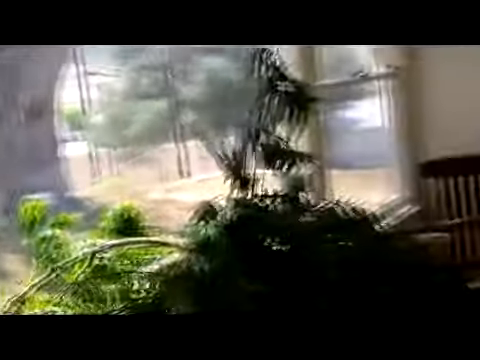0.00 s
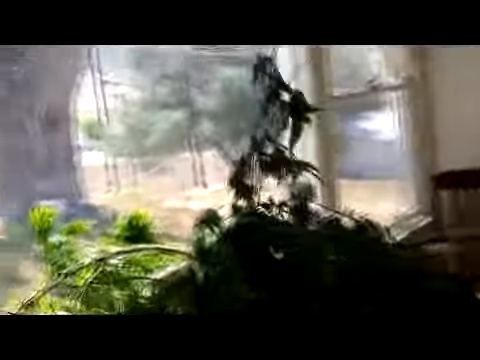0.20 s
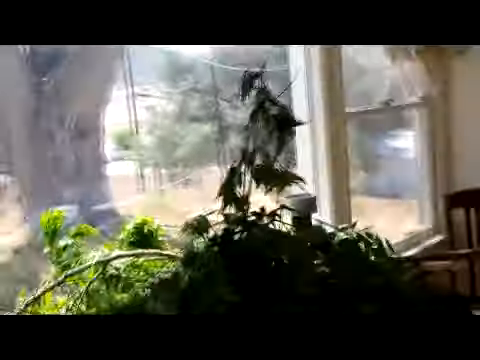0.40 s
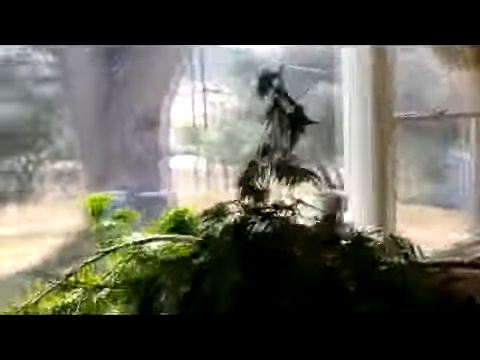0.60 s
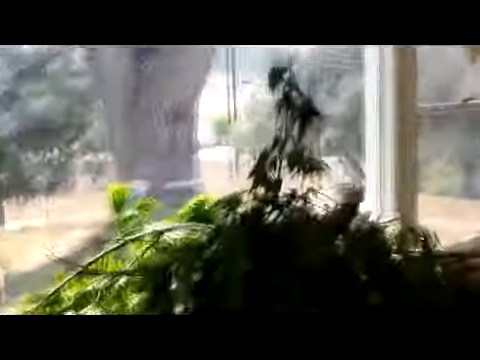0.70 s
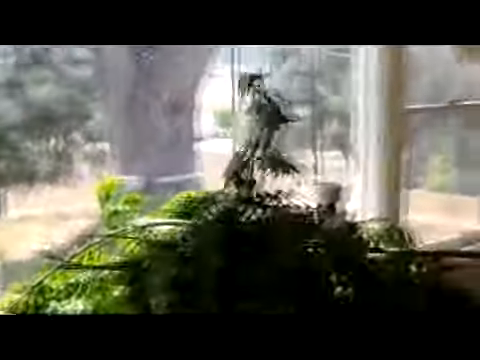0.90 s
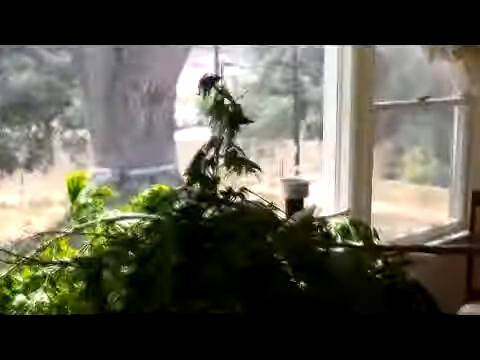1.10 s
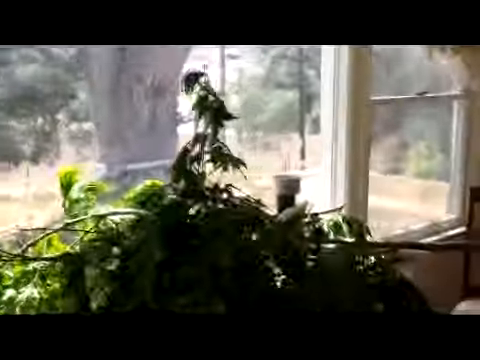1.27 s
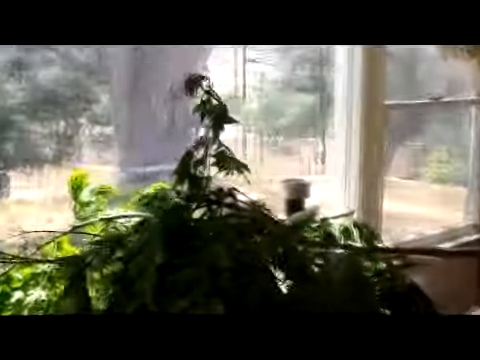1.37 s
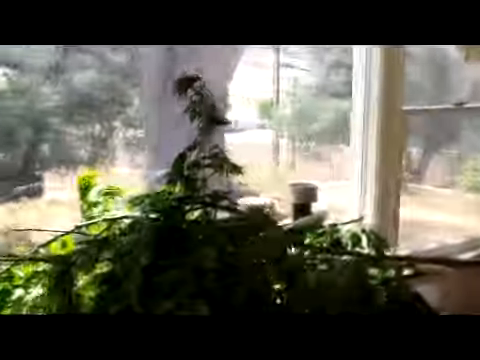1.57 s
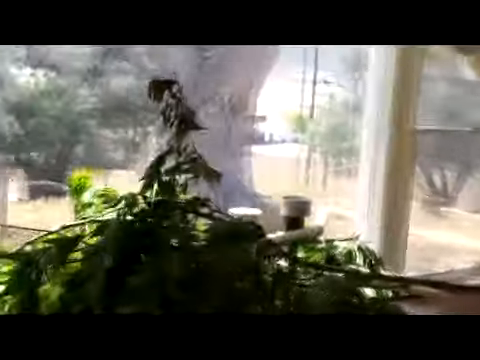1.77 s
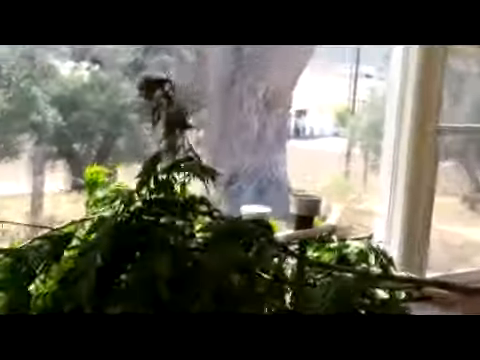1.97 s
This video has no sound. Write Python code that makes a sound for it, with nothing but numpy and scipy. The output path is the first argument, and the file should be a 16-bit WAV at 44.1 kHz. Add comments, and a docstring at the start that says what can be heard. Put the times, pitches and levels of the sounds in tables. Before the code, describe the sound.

Twigs crack amid leaf rustle, crisp from the start over low rumble. A bright double crack with a short room tail comes at 0.23 s, with faint hollow knocks. A scuff swells into dull thumps around 0.5 s, with a piercing dry snap at 0.52 and a weaker one at 0.76. Rustling thins; small cracks come at 0.8, 0.9, 1.36 and 1.5-1.7 s, with muffled rubbing as leaves swell again.

```python
"""Leaves rustle from the first moment over a low rumble, as a parrot works through branches in a living room.
Twigs crack with a short room tail; the leaves are dense clicks, the cracks clicks with splinters.
Someone shifts about with the camera: a scuff, filtered noise, swells into a dull thump of low resonances.
Softer bumps and faint hollow knocks are heard too, over quiet room air.
Two sharp, dry snaps, each a filtered double click, sound right beside the microphone."""
import sys
import numpy as np
from scipy import signal
from scipy.fft import rfft, irfft
from scipy.io import wavfile
from scipy.ndimage import uniform_filter1d

SR = 44100
rng = np.random.default_rng(int(sys.argv[2]) if len(sys.argv) > 2 else 0)


def dump(signal):
    """Clip the signal to [-1, 1] and save it as 16-bit WAV at the path in sys.argv[1]."""
    limited = np.clip(np.atleast_2d(signal).T, -1, 1)
    pcm = np.round(limited * 32767).astype(np.int16)
    wavfile.write(sys.argv[1], SR, pcm)


N = 88200
T = np.arange(N) / SR  # s


def undb(db):
    """Decibels to gain."""
    return 10 ** (np.asarray(db) / 20)


def unit(x):
    """Scale to rms 1."""
    return x / np.sqrt(np.mean(x ** 2))


def burst(x):
    """Scale each channel to energy 1."""
    return x / np.sqrt(np.sum(x ** 2, axis=-1, keepdims=True))


def curve(rows):
    """Gain over time from (t/s, level/dB) rows."""
    return undb(np.interp(T, *np.array(rows).T))


def delay(x, s):
    """Start a sound s seconds later, to a fraction of a sample, by turning its phases."""
    turn = np.exp(-1j * np.pi * np.arange(N + 1) * s * SR / N)
    return irfft(rfft(x, 2 * N) * turn)[..., :N]


def colour(x, points):
    """Causal minimum-phase filter through (f/Hz, level/dB) points."""
    hz, db = np.array(points).T
    f = np.maximum(np.arange(N + 1) * SR / (2 * N), 1)
    log_gain = np.log(undb(np.interp(np.log(f), np.log(hz), db)))
    # folding the cepstrum onto positive times makes the filter causal
    cepstrum = irfft(log_gain)
    cepstrum[1:N] *= 2
    cepstrum[N + 1:] = 0
    return irfft(rfft(x, 2 * N) * np.exp(rfft(cepstrum)))[..., :N]


def noise(points, side):
    """Coloured stereo noise of rms 1; side sets its width."""
    middle, difference = rng.standard_normal((2, N))
    stereo = np.array([middle + side * difference, middle - side * difference])
    return unit(colour(stereo, points))


def grains(per_s, scatter_db):
    """Dense tiny clicks of uneven size and random sign, different at each microphone port."""
    hit = rng.random((2, N)) < per_s / SR
    sign = np.sign(rng.standard_normal((2, N)))
    size = undb(scatter_db * np.minimum(rng.exponential(size=(2, N)), 5))
    return unit(hit * sign * size)


def fade(t60):
    """Exponential decay, 60 dB in t60 seconds."""
    return np.exp(-np.log(1000) * T / t60)


def ring(hz, t60):
    """One struck resonance: a decaying sine."""
    return np.sin(2 * np.pi * hz * T) * fade(t60)


def high_pass(x, hz):
    """Second-order cut of the bass below hz."""
    return signal.sosfilt(signal.butter(2, hz, "high", fs=SR, output="sos"), x)


def rustle():
    """Leaves brush in a fluttering crackle with stray ticks; a thin high fizz is strongest in the loud rustling."""
    # rustle level: t/s, level/dB
    brushing = [(0, -44.5), (.14, -43.5), (.22, -44.5), (.39, -44.5), (.47, -44), (.52, -46.5), (.6, -52),
                (.68, -54), (.78, -59), (.86, -56.5), (1.0, -60.5), (1.16, -62.5), (1.26, -59.5),
                (1.35, -62), (1.47, -59), (1.65, -49), (1.85, -46), (2, -45.5)]
    # colour of the leaves: f/Hz, level/dB
    leaf_colour = [(300, -9.5), (900, -11.5), (2000, -11.5), (3500, -8), (5000, -5.5), (6600, 0.5),
                   (8000, -1.5), (10000, -9), (12000, -13.5), (14000, -28.5), (15200, -51.5)]
    # colour of the thin high fizz over the leaves: f/Hz, level/dB
    fizz_colour = [(6000, -38), (10000, 0), (11500, 3), (14300, 4), (15200, -57)]
    grains_per_s, scatter_db, flicker_db = 9000, 1, 0.58
    ticks_per_s, tick_db, tick_t60_s = 59, -11.5, 0.067
    fizz_db, fizz_full_db = -14.5, -46.5  # the fizz's share when the rustle is at the second level

    flutter = rng.standard_normal(N)
    for _ in range(2):
        flutter = uniform_filter1d(flutter, size=700)
    flutter = unit(flutter)

    crackle = grains(grains_per_s, scatter_db)
    starts = (rng.random(N) < ticks_per_s / SR) * rng.random(N)
    tick_level = signal.fftconvolve(starts, fade(tick_t60_s))[:N]
    ticks = unit(tick_level * rng.standard_normal((2, N)))
    leaves = unit(colour(crackle + undb(tick_db) * ticks, leaf_colour))

    level = curve(brushing)
    fizz = unit(colour(grains(grains_per_s, scatter_db), fizz_colour))
    fizz_share = undb(fizz_db) * level / undb(fizz_full_db)  # the fizz follows the level squared
    return (leaves + fizz_share * fizz) * level * undb(flicker_db * flutter)


def background():
    """Low rumble and rubbing of movement, as noise of changing level, over the quiet air of the room."""
    # rumble level: t/s, level/dB
    rumble_level = [(0, -55), (.22, -54), (.29, -42), (.4, -52), (.47, -46.5), (.54, -39.5), (.62, -47.5),
                    (.74, -69), (.9, -65), (1.0, -71.5), (1.55, -68), (1.6, -55.5), (2, -57)]
    # rumble colour: f/Hz, level/dB
    rumble_colour = [(20, -8), (45, 6.5), (70, 2), (130, -2.5), (220, -4.5), (330, -9), (480, -23),
                     (900, -21.5), (2500, -66)]
    # level of the low, muffled rubbing: t/s, level/dB
    rub_level = [(1.56, -98), (1.59, -49), (1.66, -55.5), (1.72, -47), (1.8, -61), (1.87, -51), (2, -69)]
    # rubbing colour: f/Hz, level/dB
    rub_colour = [(40, -39), (80, -4), (115, 2.5), (175, -4), (240, -6), (330, -20.5), (600, -27.5),
                  (2000, -54)]
    # room air colour: f/Hz, level/dB
    air_colour = [(20, 23), (65, 1.5), (120, -2.5), (300, -0.5), (600, -11.5), (1500, -41), (5000, -20),
                  (14000, -50)]
    moving_side, air_side, air_db = 0.18, 0.54, -72.5

    rumble = noise(rumble_colour, moving_side) * curve(rumble_level)
    rubbing = noise(rub_colour, moving_side) * curve(rub_level)
    return rumble + rubbing + undb(air_db) * noise(air_colour, air_side)


def knocks():
    """Faint soft knocks, each with one short hollow note that rises gently and dies away."""
    # knocks: t/s, level/dB, f/Hz of the note
    knock_rows = [(0.173, -47, 341), (0.269, -34.5, 281.5), (0.351, -42, 290), (1.844, -41, 347)]
    t60_s, rise_s = 0.088, 0.0029
    out = 0
    for s, db, hz in knock_rows:
        note = ring(hz, t60_s) * (1 - np.exp(-T / rise_s))
        out = out + undb(db) * delay(note, s)
    return out


def twigs():
    """Each twig breaks in a few ms of splinters; the room rings on briefly."""
    # cracks: t/s, level/dB, woody body below 4 kHz level/dB, knock of the stem level/dB
    crack_rows = [(0.2314, 0, -3, 0), (.2432, -12, 0.5, 0), (.808, -30, 1.5, -20), (0.924, -30, 0, -36),
                  (1.3608, -22.5, -2, -17), (1.524, -38.5, 5, -9), (1.585, -22.5, -1.5, -12),
                  (1.69, -22.5, 7, -3)]
    # colour of the bright splinters: f/Hz, level/dB
    bright_colour = [(3000, -26.5), (3900, -11.5), (4400, -3.5), (5500, 0), (6800, -2), (8400, -3.5),
                     (10000, -11.5), (11500, -12), (13000, -16), (14400, -38), (15300, -62)]
    # colour of the woody body: f/Hz, level/dB
    wood_colour = [(300, -39), (900, -20), (1500, -11.5), (2000, -12), (3300, -7), (5000, -16),
                   (12000, -45), (15500, -81)]
    # colour of the stem's knock: f/Hz, level/dB
    stem_colour = [(300, -36), (520, -17), (630, -5.5), (700, -9), (790, -2.5), (950, -11), (1200, -6),
                   (1450, -26), (3000, -48), (15500, -77)]
    crack_db = 5  # added to every crack's level
    splinters_per_s, scatter_db, splinter_s, splinter_db = 6000, 9, 0.002, 7
    room_t60_s, room_build_s, room_db = 0.3, 0.0014, 7.5

    bright = wood = stem = 0
    for s, db, wood_db, stem_db in crack_rows:
        splinters = burst(grains(splinters_per_s, scatter_db) * np.exp(-T / splinter_s))
        crack = burst(signal.unit_impulse(N) + undb(splinter_db) * splinters)
        reflections = grains(per_s=12000, scatter_db=-1.5)
        room = burst(reflections * fade(room_t60_s) * (1 - np.exp(-T / room_build_s)))
        heard = undb(db + crack_db) * delay(crack + undb(room_db) * room, s)
        bright = bright + heard
        wood = wood + undb(wood_db) * heard
        stem = stem + undb(stem_db) * heard
    return colour(bright, bright_colour) + colour(wood, wood_colour) + colour(stem, stem_colour)


def scuffs():
    """Brief rubs that swell and stop: each stirs a hollow resonance, with grit on top."""
    # scuffs: t/s of the peak, level/dB, rise/s, fall/s, gritty treble level/dB, f/Hz of the hollow
    scuff_rows = [(0.467, -47.5, 0.041, 0.0092, 1.5, 865), (0.488, -35, 0.013, .016, -10.5, 650),
                  (0.551, -54.5, 0.016, 0.014, 13.5, 566), (1.16, -72.5, 0.024, 0.052, -1, 620),
                  (1.251, -66, 0.029, 0.042, 1, 566), (1.98, -57, 0.036, 0.069, 2.5, 557)]
    # colour of the rub: f/Hz, level/dB
    scuff_colour = [(150, 0.5), (370, -2), (470, -3), (650, -2), (900, -0.5), (1200, -8), (1800, -18),
                    (3500, -53)]
    # colour of the grit: f/Hz, level/dB
    grit_colour = [(700, -20), (1600, 13.5), (2500, 9), (3600, 7), (5500, 10.5), (7000, 0), (10000, -67),
                   (14000, -59)]
    side, rub_db, hollow_db, hollow_t60_s = 0.29, 2, -2, 0.06

    rub = noise(scuff_colour, side)
    grit = unit(colour(grains(per_s=6000, scatter_db=-0.5), grit_colour))
    out = 0
    for s, db, rise_s, fall_s, grit_db, hz in scuff_rows:
        swell = np.exp(-np.maximum((s - T) / rise_s, (T - s) / fall_s))
        hollow = unit(signal.fftconvolve(rub, ring(hz, hollow_t60_s)[None])[:, :N])
        rubbed = undb(rub_db) * rub + undb(hollow_db) * hollow + undb(grit_db) * grit
        out = out + undb(db) * swell * rubbed
    return out


def bumps():
    """Soft pushes give a dead thud with little deep bass and leave low resonances ringing."""
    # dull bumps: t/s, level/dB, length of the push/s
    bump_rows = [(0.4898, 0.5, 0.00324), (0.5055, -3, .006), (0.5396, -4, 0.0033), (0.653, -15.5, 0.0065),
                 (1.581, -27, 0.0036)]
    # resonances the bumps ring with: f/Hz, level/dB, t60/s
    boom_modes = [(67.7, -17, 1.06), (113.5, -2.5, 0.32), (175.8, -5.5, 0.21), (214, -8.5, 0.28),
                  (246.2, -3.5, .28), (300, -16.5, 0.13), (354, -1, 0.12), (537, -9, .12)]
    thud_hz, thud_t60_s, thud_low_hz = 130, 0.028, 56.4
    thud_db, boom_db = -11.5, -29

    thud = high_pass(ring(thud_hz, thud_t60_s), thud_low_hz)
    boom = sum(undb(db) * ring(hz, t60) for hz, db, t60 in boom_modes)
    body = undb(thud_db) * thud + undb(boom_db) * boom
    force = 0
    for s, db, push_s in bump_rows:
        push = np.sin(np.pi * np.minimum(T / push_s, 1)) ** 2
        force = force + undb(db) * delay(push / push.sum(), s)
    return signal.fftconvolve(force, body)[:N]


def snaps():
    """Sharp dry snaps at the microphone, each two clicks well under a millisecond apart, first at the right port."""
    # close snaps: t/s, level/dB, body below 6 kHz level/dB, second click after/s, its level/dB,
    # body left minus right/dB, left port later by/s, top treble level/dB
    snap_rows = [(0.5193, 14.5, -17, 0.000258, -10, -4.5, 0.000449, -1),
                 (0.7622, -5, -17, .00012, -27, 20.5, 0.000377, -9)]
    # colour at the left port: f/Hz, level/dB
    left_colour = [(3000, -41), (5300, -12.5), (6000, -4), (6900, 5), (8000, -7), (9400, -34),
                   (10500, -9.5), (13500, -12), (16000, -25)]
    # colour at the right port: f/Hz, level/dB
    right_colour = [(3000, -23), (5300, -8), (6400, -5.5), (7600, 9), (8700, 2.5), (9600, 3.5),
                    (12000, -0.5), (14500, 0.5), (16000, -25)]
    # colour of the body: f/Hz, level/dB
    body_colour = [(200, -37), (500, -10.5), (900, 5), (1700, -0.5), (2800, 6), (3700, -4), (4700, -11),
                   (5500, -19), (6500, -47)]
    # the top treble shelves off between these two: f/Hz
    shelf_hz = (9100, 12400)

    out = 0
    for s, db, body_db, gap_s, second_db, pan_db, lag_s, top_db in snap_rows:
        shelf = list(zip(shelf_hz, (0, top_db)))
        click = colour(delay(signal.unit_impulse(N), s), shelf)
        click = click + undb(second_db) * delay(click, gap_s)
        body = undb(body_db) * colour(click, body_colour)
        left = delay(colour(click, left_colour) + undb(pan_db / 2) * body, lag_s)
        right = colour(click, right_colour) + undb(-pan_db / 2) * body
        out = out + undb(db) * np.array([left, right])
    return out


def scene():
    """All sources as they reach the two microphone ports."""
    return rustle() + background() + knocks() + twigs() + scuffs() + bumps() + snaps()


def record(dry):
    """The recorder thins the deepest bass, clips the peaks and cuts the top."""
    low_cut_hz, ceiling, top_hz = 61, 0.85, 16300
    clipped = np.clip(high_pass(dry, low_cut_hz), -ceiling, ceiling)
    top_cut = signal.ellip(8, 0.2, 70, top_hz, fs=SR, output="sos")  # 0.2 dB ripple, 70 dB rejection
    return signal.sosfilt(top_cut, clipped)


dry = scene()
out = record(dry)
dump(out)
```